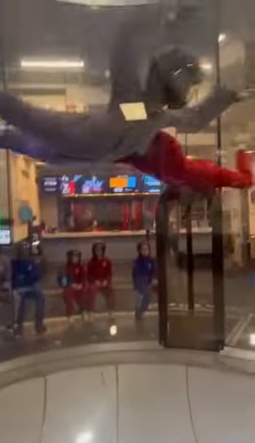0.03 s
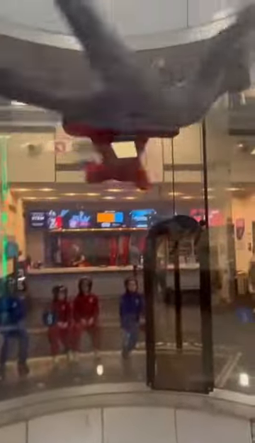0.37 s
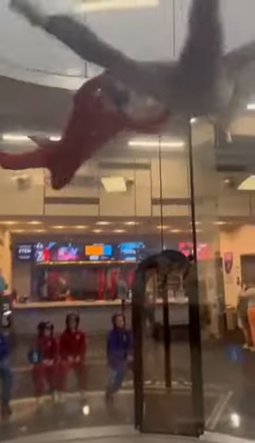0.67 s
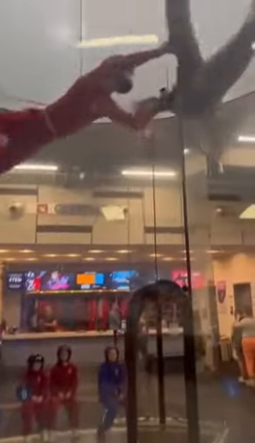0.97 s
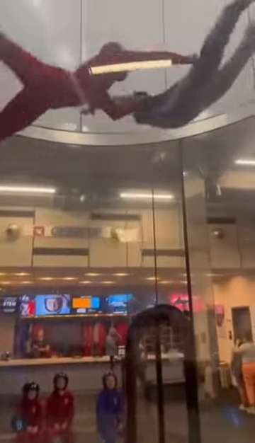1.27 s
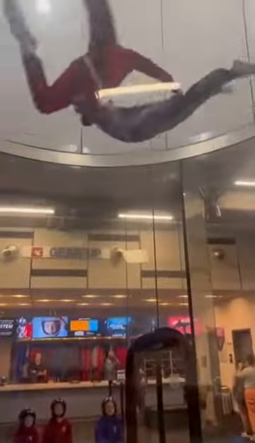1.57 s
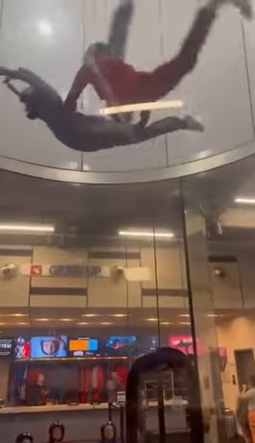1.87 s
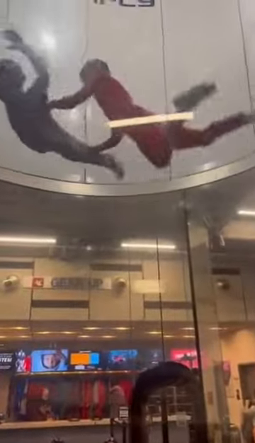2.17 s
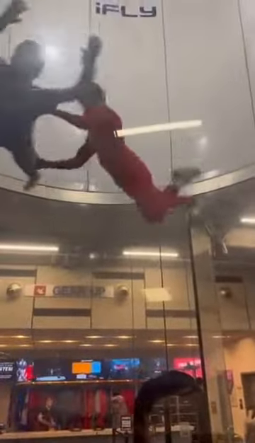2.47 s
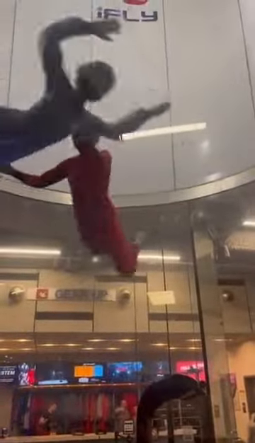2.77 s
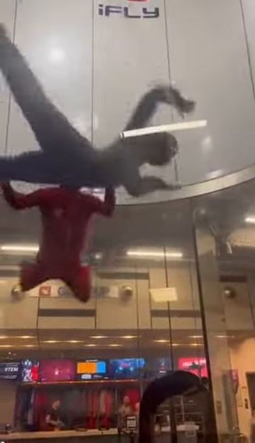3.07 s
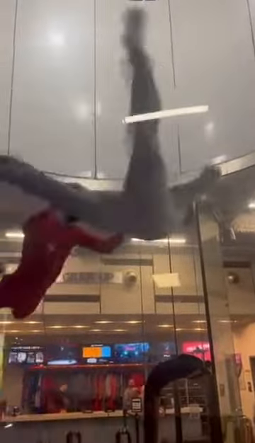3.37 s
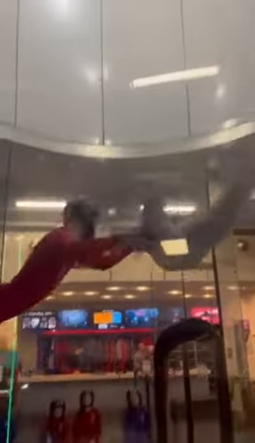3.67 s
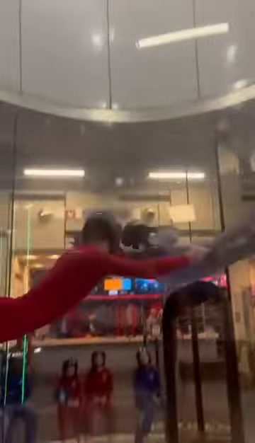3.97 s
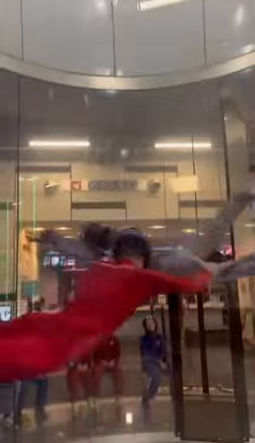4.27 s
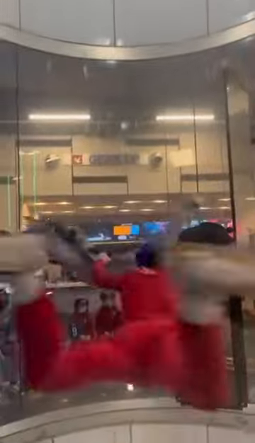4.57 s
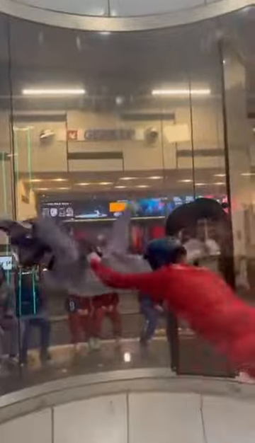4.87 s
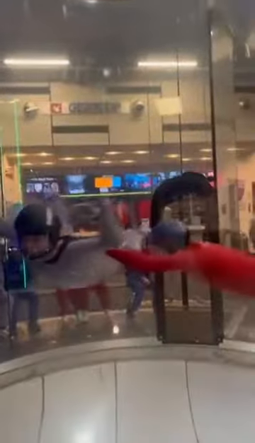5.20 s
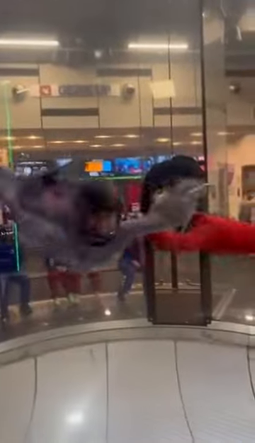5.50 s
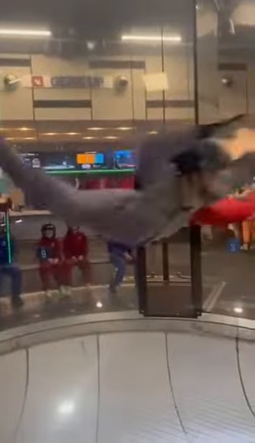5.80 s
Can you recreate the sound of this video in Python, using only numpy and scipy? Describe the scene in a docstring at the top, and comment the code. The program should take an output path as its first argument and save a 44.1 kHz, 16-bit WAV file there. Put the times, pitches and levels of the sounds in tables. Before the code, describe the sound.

Inside the glass chamber of a vertical wind tunnel, fan-driven air roars loudly and steadily all around a close stereo microphone. A low duct boom swells and sinks beneath it, while air hisses lightly over two flyers' suits. Faint, brief whistling tones come and go in the first half, then gather at a lower pitch. Low tones swell slightly near the end, and the wind keeps blowing.

```python
"""Inside the glass chamber of a vertical wind tunnel: two close microphone ports, two flyers overhead.
From the start fan-driven air roars, the duct booms and sinks by turns, suits hiss, edges whistle faintly.
In the first 2.5 s limbs cut the stream in short rushes, and shed vortices sing, mostly near 1160 Hz.
From about 3 s the vortex tones crowd lower, around 600-900 Hz; near 5 s low ones swell under the roar.
The wind is still blowing at the end, 6 s in."""
import sys
import numpy as np
from scipy import signal
from scipy.fft import rfft, irfft, next_fast_len
from scipy.io import wavfile
from scipy.ndimage import uniform_filter1d

SR = 44100
rng = np.random.default_rng(int(sys.argv[2]) if len(sys.argv) > 2 else 0)


def generate_wav(sig):
    """Save sig (samples, or channels by samples) to the path in sys.argv[1] as 16-bit PCM at SR."""
    pcm = np.round(np.clip(np.atleast_2d(sig).T, -1, 1) * 32767).astype(np.int16)
    wavfile.write(sys.argv[1], SR, pcm)


N = 266364
SIZE = next_fast_len(N + SR // 4, True)
FREQS = np.maximum(np.arange(SIZE // 2 + 1) * SR / SIZE, 1)
SIDES = np.array([[1], [-1]])   # left port, right port

# Levels in the tables are relative: each layer adds its own gain.
# strength of the stream: t/s, roar level/dB, hiss level/dB
STREAM_LEVELS = [(0, -28.5, -60.5), (1, -27.5, -60.5), (1.75, -27.5, -59.5), (2.1, -27.5, -58),
                 (2.6, -27, -59), (3.4, -27.5, -58.5), (4.2, -27.5, -59.5), (5, -27.5, -60),
                 (6, -27.5, -60)]
# spectrum of turbulent air in the duct: f/Hz, level/dB
ROAR_SPECTRUM = [(20, -17.5), (42, -5), (75, -2.5), (165, 0.2), (290, -2.5), (390, 0.03), (560, -1),
                 (760, -10), (1050, -17), (1300, -25), (1600, -31), (2000, -45), (2800, -61)]
# slow swell of the duct's boom: t/s, level/dB
BOOM_SWELL = [(0, -22), (.5, -28.5), (1, -26.5), (1.6, -25.5), (2.2, -25.5), (2.8, -28), (3.3, -28),
              (4, -26), (4.6, -29), (5.1, -29), (6, -25.5)]
# pitch of the boom: t/s, f/Hz
BOOM_GLIDE = [(.2, 110), (.5, 116), (.9, 117), (1.5, 114), (2.1, 115), (2.5, 109), (3, 110), (3.2, 112),
              (3.45, 105), (3.7, 113), (4.3, 113), (4.7, 110), (5.5, 111), (6, 109)]
# moments when the low boom briefly swells or drops: t/s, half length/s, level/dB
BOOM_SURGES_AND_DIPS = [(.085, 0.013, -25), (.135, 0.032, -43), (0.21, 0.042, -20.5), (0.393, .03, -35),
                        (0.513, .022, -22.5), (0.794, 0.081, -19.5), (.87, 0.018, -35), (1.002, 0.024, -20),
                        (1.17, 0.014, -16), (1.227, .015, -22.5), (1.315, 0.023, -17.5),
                        (1.428, 0.038, -19), (1.54, 0.014, -15.5), (1.665, 0.015, -17.5),
                        (1.728, .018, -21), (1.94, 0.028, -38), (2.044, 0.017, -15.5), (2.2, 0.034, -24),
                        (2.547, .025, -37), (2.76, 0.026, -37), (2.943, .016, -23.5), (3.033, 0.047, -19.5),
                        (3.195, 0.023, -23.5), (3.289, 0.014, -18), (3.375, 0.035, -21),
                        (3.517, 0.027, -23), (3.652, 0.044, -19.5), (3.928, 0.036, -22),
                        (3.995, 0.054, -19.5), (4.267, .07, -36), (4.403, 0.053, -21.5),
                        (4.713, .022, -21.5), (4.76, .02, -21.5), (4.847, 0.0086, -15.5),
                        (4.953, 0.017, -18.5), (5.057, .038, -21), (5.368, 0.018, -21), (5.515, 0.026, -46),
                        (5.577, 0.02, -15)]
# swell of the rumble an octave below: t/s, level/dB
RUMBLE_SWELL = [(0, -33), (.28, -33), (.39, -52), (.53, -30), (.7, -38.5), (1.3, -34), (1.65, -44),
                (1.9, -28), (2.3, -48.5), (2.9, -31), (3.45, -37.5), (3.63, -25), (3.78, -44),
                (4.08, -30.5), (4.4, -44), (4.58, -33), (4.72, -43.5), (5.08, -32), (5.5, -39.5),
                (5.87, -29), (6.04, -39)]
# steady resonances of duct and chamber: f/Hz, width/Hz, level/dB
DUCT_RESONANCES = [(88.9, 3.4, -38.5), (135.7, 8.8, -31.5), (147, 2.4, -44.5), (230.3, 14, -38),
                   (351.2, 8.6, -40.5), (418, 9.7, -50), (579.7, 8.8, -43), (645, 20, -43), (908, 8, -54.5),
                   (1160, 30, -52)]
# tones sung by shed vortices: t/s, half length/s, f/Hz, level/dB
VORTEX_TONES = [(.07, 0.11, 1172, -47), (.283, .07, 1163, -44.5), (.44, .05, 1168, -48),
                (.752, .09, 1160, -45.5), (1, .11, 1164, -44.5), (1.19, .06, 1162, -48.5),
                (1.453, .09, 1159, -45), (1.75, .13, 1162, -52.5), (3.194, .06, 1163, -46.5),
                (4.7, .13, 1156, -49), (1.4, 0.58, 1340, -60), (2.75, .15, 993, -44.5),
                (3.5, .2, 913, -42.5), (3.93, .22, 913, -42.5), (4.42, .16, 906, -46),
                (3.699, .13, 840, -44), (4.149, .1, 846, -42), (1.061, .05, 580, -33),
                (2.143, .11, 581, -33.5), (3.204, 0.05, 583, -35), (3.424, 0.088, 578, -31.5),
                (3.582, .05, 598, -32), (4.224, .055, 583, -30.5), (4.329, 0.055, 575, -30.5),
                (3.44, .08, 637, -34), (3.707, .11, 675, -37.5), (4.022, 0.04, 639, -38),
                (5.04, .1, 765, -37.5), (.53, 0.32, 229, -36.5), (4.2, .2, 233, -33.5), (5, .28, 240, -35),
                (5.1, 0.41, 84, -32)]
# spectrum of air over the suits: f/Hz, level/dB
SUIT_SPECTRUM = [(1300, -18), (2000, 1), (2420, -2), (2800, 1.5), (3400, 0.5), (3750, -4.5), (4100, -6),
                 (4750, -9.5), (5400, -13.5), (5800, -16.5), (6100, -26.5)]
# limbs cutting through the stream: t/s, half length/s, level/dB
LIMB_RUSHES = [(.89, .09, -61), (1.19, .04, -67), (1.46, .06, -59.5), (2.02, .045, -63), (2.47, .05, -67)]
# spectrum of their brighter hiss: f/Hz, level/dB
LIMB_SPECTRUM = [(2500, -12), (3500, -2), (4300, 0), (5200, -2), (6000, -13)]
# whistles at edges in the stream: f/Hz, width/Hz, level against the hiss curve/dB
EDGE_WHISTLES = [(3324, 85, -6.5), (3508, 46, -7), (4060, 79, -15)]
# sound field at the two microphone ports: f/Hz, likeness (-1..1), left lag/rad, left minus right/dB
MIC_FIELD = [(40, .94, .15, .6), (110, .98, .54, 3), (330, .91, 1.03, .2), (750, .8, 1.19, 0),
             (1150, .8, .61, .8), (1550, .9, 0, .4), (1800, .45, -.38, -.2), (2050, -.34, -.45, 1.2),
             (2500, -.58, 0, .2), (3100, -.29, .27, 0), (3500, .2, 1.5, -.3), (3950, .74, .19, 0),
             (4250, .62, .15, 0), (4500, .1, .5, 0), (4900, -.3, -.85, 0)]

ROAR_DB, BOOM_DB, TONE_DB, HISS_DB = 3, -0.57, 0.4, 4.5   # layer gains
BOOM_HZ, RUMBLE_HZ = 113.07, 56.26
CROSSING_S = .0131   # mean delay of the echo across the chamber
GRAIN_EDGES_HZ = np.geomspace(1200, 7000, 49)
TREBLE_EDGE_HZ, MIRROR_HZ, CUTOFF_HZ = 6850, 9600, 10700


def roar(level_db):
    """The fan-driven stream roars all round the microphone, stirred slightly by eddies."""
    eddies_db = .5 * drift(rate=24)
    air = turbulence(colour(ROAR_SPECTRUM))
    return from_db(level_db + ROAR_DB + eddies_db) * glass_echo(air, echo_db=-9.5, sway=.018)


def glass_echo(x, echo_db, sway):
    """The curved glass throws the upper roar back; a swaying path makes the hollow colour waver."""
    upper = signal.sosfiltfilt(signal.butter(2, 550, "high", fs=SR, output="sos"), x)
    n = np.arange(N)
    sent_at = n - CROSSING_S * SR * (1 + sway * drift(rate=.4))
    echo = np.array([np.interp(sent_at, n, side, left=0) for side in upper])
    return rms_one(x + from_db(echo_db) * echo)


def duct():
    """The air column booms on two low notes an octave apart, the upper gliding, among weaker modes."""
    glide_hz = in_time(BOOM_GLIDE)[0] - BOOM_HZ
    boom = boom_strength() * bend(oscillation(BOOM_HZ, width_hz=5.05, steadiness=1.0), glide_hz)
    rumble = from_db(in_time(RUMBLE_SWELL)[0]) * oscillation(RUMBLE_HZ, width_hz=0.88, steadiness=0.5)
    modes = sum(from_db(db) * turbulence(resonance(hz, width)) for hz, width, db in DUCT_RESONANCES)
    return boom + rumble + modes


def boom_strength(uneven_db=1.7):
    """The boom swells slowly and a little unevenly, with brief surges and dips."""
    strength = from_db(in_time(BOOM_SWELL)[0] + uneven_db * drift(rate=15))
    for s, half, db in BOOM_SURGES_AND_DIPS:
        strength += bump(s, half) * (from_db(db) - strength)
    return from_db(BOOM_DB) * strength


def oscillation(hz, width_hz, steadiness):
    """A flow-fed resonance: its phase wanders while saturation partly evens its strength."""
    ringing = turbulence(resonance(hz, width_hz))
    power = uniform_filter1d(np.mean(ringing ** 2, axis=0), int(4 * SR / BOOM_HZ))   # four boom cycles
    return rms_one(ringing / (power + 0.074) ** (steadiness / 2))


def vortex_tones(waver_hz=7.5, flicker_db=1.8):
    """Shed vortices lock for a while onto an edge or a duct mode and sing a narrow, wavering tone."""
    out = np.zeros((2, N))
    _, lag, _ = in_frequency(MIC_FIELD)
    waver = waver_hz * drift(rate=11)
    flicker = from_db(flicker_db * drift(rate=18))
    for s, half, hz, db in VORTEX_TONES:
        start_turn = rng.random()
        offset = int(rng.random() * N)   # each tone wavers and flickers in its own way
        swell = bump(s, half) * np.roll(flicker, offset)
        on = swell > from_db(-50)
        phase = 2 * np.pi * (start_turn + np.cumsum(hz + np.roll(waver, offset)[on]) / SR)
        at_ports = np.sqrt(2) * np.sin(phase - SIDES * np.interp(hz, FREQS, lag) / 2)
        out[:, on] += from_db(db + TONE_DB) * swell[on] * at_ports
    return out


def suits(level_db, rasp_db=0.53):
    """Overhead, air hisses over the suits and rushes brighter where a limb cuts through it."""
    hiss = from_db(level_db + HISS_DB) * turbulence(colour(SUIT_SPECTRUM))
    rasp = rms_one(from_db(rasp_db * drift(rate=63)))
    swells = sum(from_db(db) * bump(s, half) for s, half, db in LIMB_RUSHES)
    limbs = swells * turbulence(colour(LIMB_SPECTRUM))
    spectrum = rfft(rasp * (hiss + limbs), SIZE)
    bands = zip(GRAIN_EDGES_HZ, GRAIN_EDGES_HZ[1:], hiss_grain())
    return sum(gain * irfft(spectrum * ((FREQS >= low) & (FREQS < high)), SIZE)[:, :N]
               for low, high, gain in bands)


def hiss_grain(steps_per_s=40):
    """Grainy hiss: each band's level flickers at random, partly together, partly on its own."""
    shared_db = .55 * drift(rate=22)
    band_db = rng.uniform(-14.3, 5.5, (len(GRAIN_EDGES_HZ) - 1, N * steps_per_s // SR + 2))
    steps = np.arange(N) * steps_per_s / SR
    return [rms_one(from_db(shared_db + np.interp(steps, np.arange(len(row)), row))) for row in band_db]


def edge_whistles(level_db, sputter_db=2.2, waver_hz=35):
    """In the background, edges in the stream whistle and sputter, rising and falling with the hiss."""
    out = np.zeros((2, N))
    for hz, width, db in EDGE_WHISTLES:
        strength = from_db(level_db + db + sputter_db * drift(rate=30))
        out += strength * bend(turbulence(resonance(hz, width)), waver_hz * drift(rate=12))
    return out


def turbulence(gain):
    """Random pressure of a given colour as it reaches the two microphone ports; unit power."""
    alike, lag, balance_db = in_frequency(MIC_FIELD)
    common, apart = rfft(rng.standard_normal((2, SIZE)))
    pair = np.sqrt(1 + alike) * common + SIDES * np.sqrt(1 - alike) * apart
    pair = pair * np.exp(-.5j * SIDES * lag) * from_db(SIDES * balance_db / 2)
    return rms_one(irfft(pair * gain, SIZE)[:, :N])


def colour(spectrum):
    """Gain of a broad spectrum that falls away beyond its ends."""
    skirts = np.minimum(FREQS / spectrum[0][0], 1) * np.minimum(spectrum[-1][0] / FREQS, 1)
    return from_db(in_frequency(spectrum)[0]) * skirts ** 2


def resonance(hz, width_hz):
    """Gain of a resonance: 1 on top, a half at width_hz to either side."""
    return 1 / (1 + ((FREQS - hz) / width_hz) ** 2)


def drift(rate):
    """Random wander with spread 1, mostly slower than rate (Hz)."""
    return rms_one(irfft(rfft(rng.standard_normal(SIZE)) / (1 + (FREQS / rate) ** 2), SIZE)[:N])


def bend(x, shift_hz):
    """Move a narrow sound up or down by a changing number of hertz."""
    return np.real(signal.hilbert(x, SIZE)[:, :N] * np.exp(2j * np.pi * np.cumsum(shift_hz) / SR))


def bump(centre_s, half_s):
    """A smooth swell of height 1."""
    return np.exp(-((np.arange(N) / SR - centre_s) / half_s) ** 2)


def in_time(rows):
    """Each column of a curve table, sample by sample."""
    s, *columns = np.transpose(rows)
    return [np.interp(np.arange(N) / SR, s, c) for c in columns]


def in_frequency(rows):
    """Each column of a spectrum table, joined on a log-frequency axis."""
    hz, *columns = np.transpose(rows)
    return [np.interp(np.log(FREQS), np.log(hz), c) for c in columns]


def from_db(db):
    """Decibels to gain."""
    return 10 ** (np.asarray(db) / 20)


def rms_one(x):
    """Scale to unit power."""
    return x / np.sqrt(np.mean(x ** 2) + 1e-20)


def scene():
    """All the moving air, heard from the microphone's place inside the chamber."""
    roar_db, hiss_db = in_time(STREAM_LEVELS)
    return roar(roar_db) + duct() + vortex_tones() + suits(hiss_db) + edge_whistles(hiss_db)


def record(dry):
    """The treble falls away steeply above about 6 kHz; a faint, thin whistle higher up follows the bass."""
    dull = signal.sosfilt(signal.cheby2(20, 70, TREBLE_EDGE_HZ, fs=SR, output="sos"), dry)
    bass = signal.sosfilt(signal.butter(3, 420, fs=SR, output="sos"), dry)
    whistle = from_db(-62) * bass * np.cos(2 * np.pi * MIRROR_HZ * np.arange(N) / SR)
    return signal.sosfilt(signal.cheby2(20, 70, CUTOFF_HZ, fs=SR, output="sos"), dull + whistle)


dry = scene()
out = record(dry)
generate_wav(out)
```